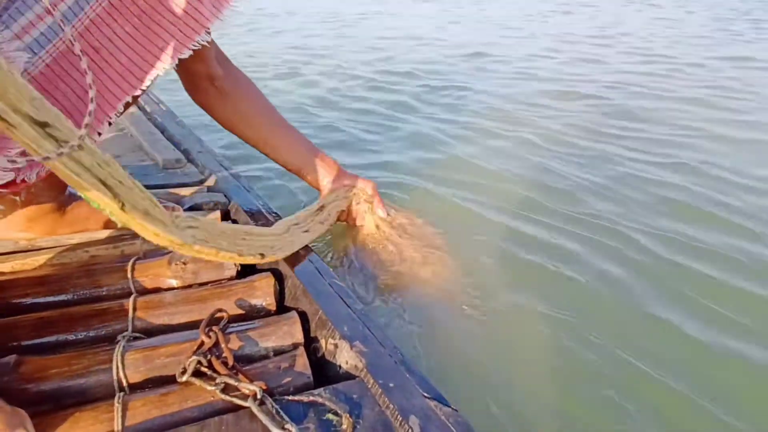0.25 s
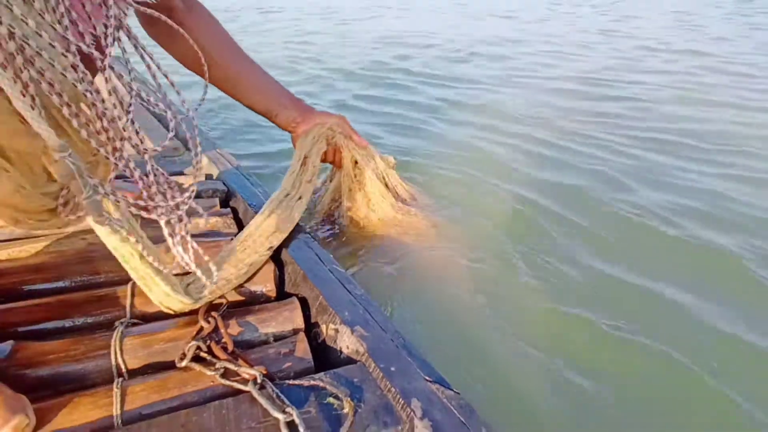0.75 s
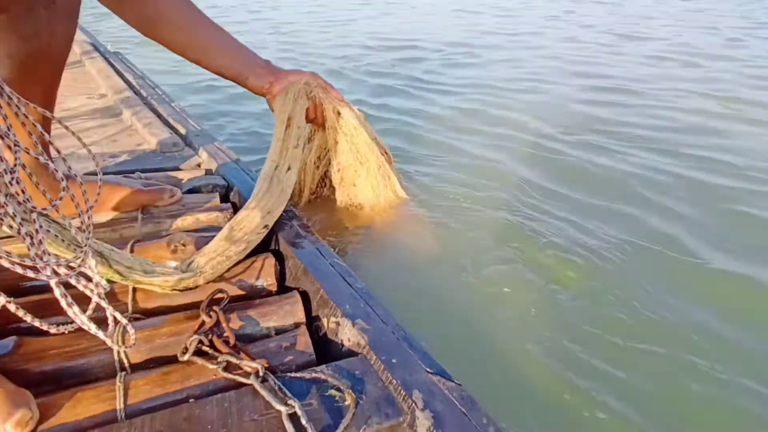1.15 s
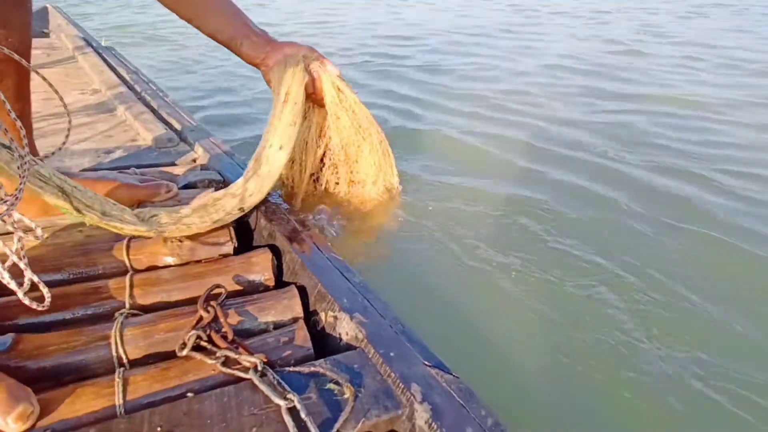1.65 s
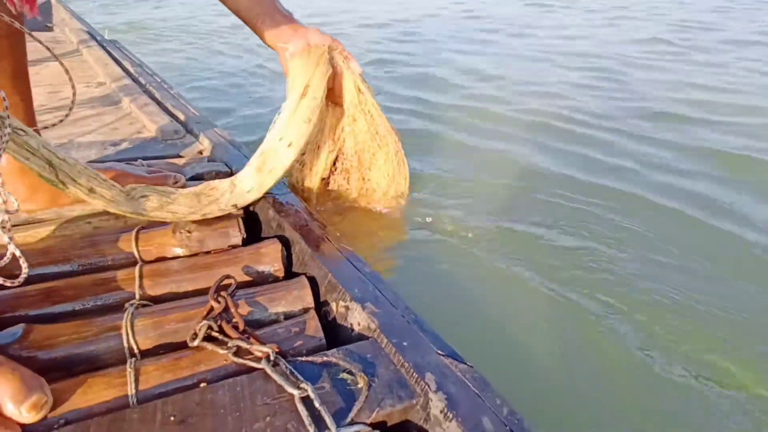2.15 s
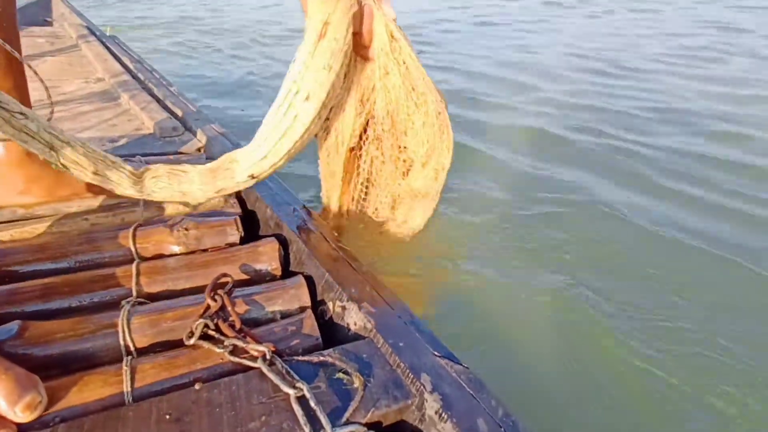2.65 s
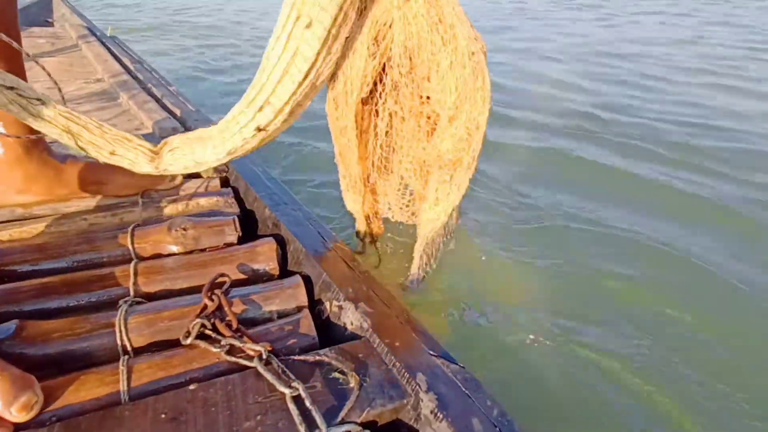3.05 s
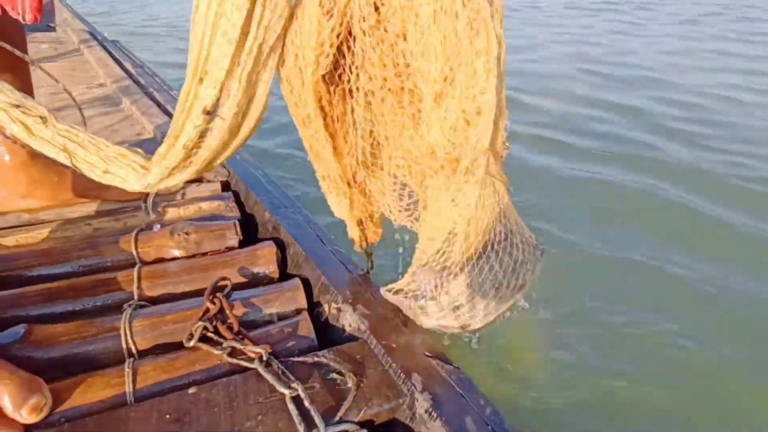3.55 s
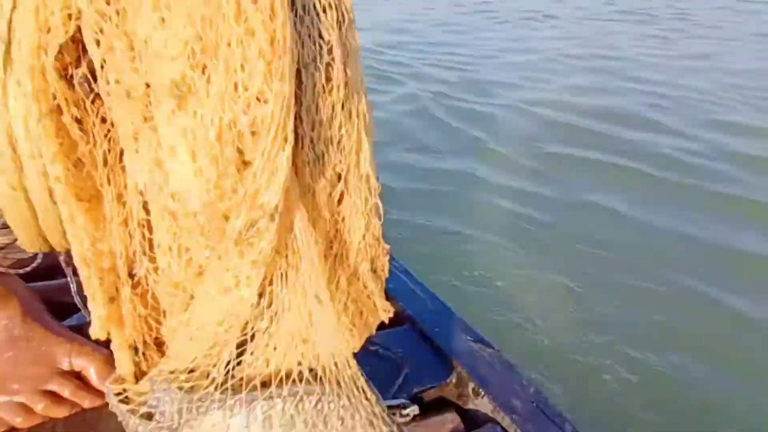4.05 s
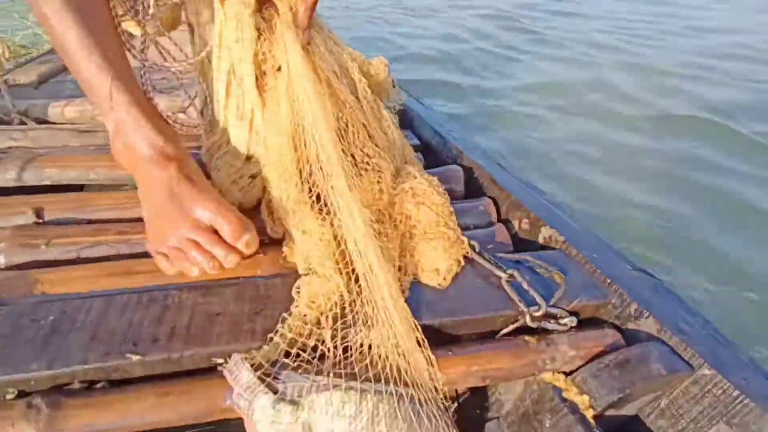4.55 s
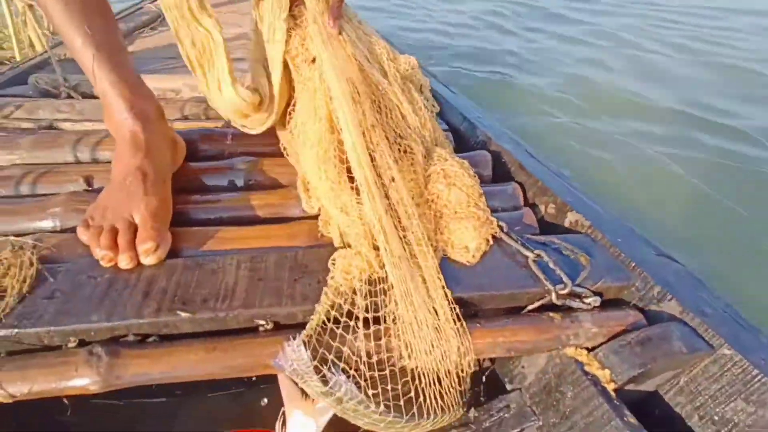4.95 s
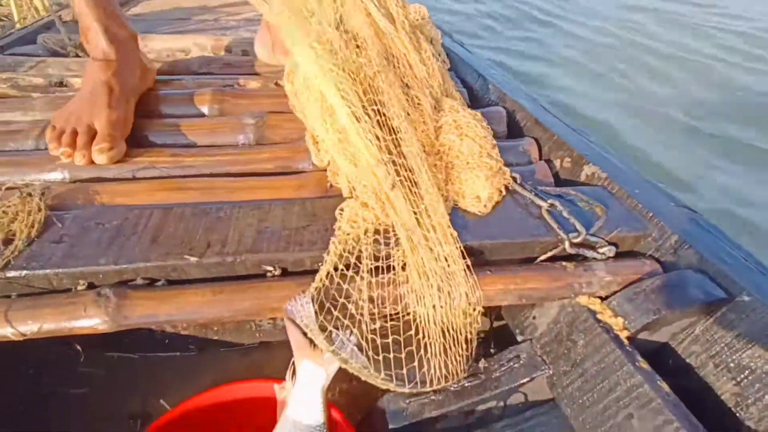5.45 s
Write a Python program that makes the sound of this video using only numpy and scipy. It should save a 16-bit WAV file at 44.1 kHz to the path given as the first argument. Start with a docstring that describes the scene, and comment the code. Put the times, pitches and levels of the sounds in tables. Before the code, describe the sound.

A breezy river heard close up from a wooden boat, in one channel. From the start, soft low wind rumbles and lumpy thumps buffet the microphone over a faint, smooth water hiss. A light wooden tick comes at 0.2 s, and drips and small bubble plinks gather around 0.8 to 1.8 s. It is then calmer until about 2.8 s, with thumps and barely audible thin bird whistles near 0.7, 2.1 and 2.4 s. From 2.9 to 4 s water runs off the lifted net in quick ticks, spits and upward-chirping bubbles, busiest around 3.5 s. Wet spatter leads into the loudest moment at about 4.25 s: a sharp, dry, woody smack with clustered knocks and a crackling burst of spray. Smaller knocks fade by 4.55 s. Crisp spatters follow at 4.65 to 4.8 s, then a faint tap at 5 s, a dull thump at 5.3 s, and light drips over a brighter hiss until 5.7 s.

```python
"""Hauling in a wet net

On a breezy day a wet net comes out of a river into a wooden boat. Its bundle slaps onto the planks:
crackling noise, a hail of drops, a sharp click, and knocks that ring the wood as fading sines.
Drops burst as puffs of noise and trap bubbles that ring, most rising in pitch. Behind them the river
hisses as shaped noise, wind rumbles and thumps on the microphone, and a far bird whistles arched sines."""
import sys
import numpy as np
from scipy import signal
from scipy.fft import rfft, irfft
from scipy.io import wavfile

SR = 44100
rng = np.random.default_rng(int(sys.argv[2]) if len(sys.argv) > 2 else 0)


def digitize_waveform(pressure):
    """Quantize a signal to 16-bit integers and store it at the path in sys.argv[1].

    Rows of a 2-D input are taken as channels; values are limited to [-1, 1].
    """
    field = np.atleast_2d(pressure).T
    bounded = np.clip(field, -1, 1)
    quanta = np.round(bounded * 32767).astype(np.int16)
    wavfile.write(sys.argv[1], SR, quanta)


N = 251811   # length in samples


def from_db(db):
    """Turns decibels into a plain gain."""
    return 10 ** (np.asarray(db) / 20)


def rms_one(x):
    """Scales a sound to an rms (average strength) of 1."""
    return x / np.sqrt(np.mean(x ** 2) + 1e-20)


def in_time(rows):
    """Joins the rows of a table with straight lines; one curve for each column after the time."""
    s, *columns = np.transpose(rows)
    return [np.interp(np.arange(N) / SR, s, c) for c in columns]


def band(x, low_hz, high_hz):
    """Keeps the sound between two pitches."""
    edges = [low_hz, min(high_hz, .45 * SR)]
    return signal.sosfilt(signal.butter(2, edges, "band", fs=SR, output="sos"), x)


def drift(rate_hz):
    """A random curve of rms 1 that wanders slowly or quickly; made at every 40th sample, then joined up."""
    r = np.exp(-80 * np.pi * rate_hz / SR)
    slow = signal.lfilter([1], [1, -2 * r, r * r], rng.standard_normal(N // 40 + 2002))[2000:]
    return np.interp(np.arange(N) / 40, np.arange(len(slow)), rms_one(slow))


def colour(x, spectrum):
    """Weights each pitch of x by the table, then scales to rms 1."""
    hz, db = np.transpose(spectrum)
    grid = np.maximum(np.arange(N // 2 + 1) * SR / N, 1)
    gain = from_db(np.interp(np.log(grid), np.log(hz), db))
    return rms_one(irfft(rfft(x) * gain, N))


def ring(clicks, hz, t60):
    """Each unit click starts a sine of height 1 that fades by 60 dB in t60 seconds."""
    r, w = from_db(-60 / (t60 * SR)), 2 * np.pi * hz / SR
    return signal.lfilter([0, np.sin(w)], [1, -2 * r * np.cos(w), r * r], clicks + 1e-18)


def add(out, s, x):
    """Mixes x into out, starting at s seconds."""
    i = round(s * SR)
    out[i:i + len(x)] += x[:N - i]


# weights and bundle hitting the planks: t/s, strength level/dB
BLOWS = [(0.226, -23), (0.505, -40), (0.848, -39.5), (2.298, -37), (2.427, -39.5), (3.807, -45),
         (4.227, -14.5), (4.265, -15), (4.278, -6), (4.376, -27), (4.409, -23), (4.452, -35),
         (4.489, -29.5), (4.538, -34.5), (5.006, -33.5)]
# ways the planks ring: f/Hz, relative level/dB, time to fade by 60 dB t/s
PLANK_MODES = [(386, 6, 0.0088), (522, 3.5, 0.045), (744, -0.5, 0.037), (920, 2, 0.023), (1284, 3.5, 0.034),
               (1600, 5.5, 0.021), (2083, -9, 0.04)]


def knocks():
    """A blow gives a short crack of noise and sets every plank mode ringing afresh."""
    crack_db, ring_db = -14.5, -15.5   # relative to the blow's strength
    out, t = np.zeros(N), np.arange(SR // 8) / SR
    chance_db = rng.normal(0, 2, (len(BLOWS), len(PLANK_MODES)))
    cracks = rng.standard_normal((len(BLOWS), len(t)))
    for (s, db), luck_db, crack in zip(BLOWS, chance_db, cracks):
        crack = crack + 14.3 * (t == 0)      # the first contact is the sharpest
        for low_hz, high_hz in [(620.0, 4600.0), (400.0, 4700.0), (300.0, 5100.0)]:
            crack = band(crack, low_hz, high_hz)
        add(out, s, from_db(db + crack_db - 60 * t / 0.0078) * rms_one(crack))
        for k, (hz, level_db, t60) in enumerate(PLANK_MODES):
            gain = from_db(db + level_db + luck_db[k] + ring_db)
            fade = (-1) ** k * from_db(-60 * t / t60)   # every other mode is flipped
            add(out, s, gain * fade * np.sin(2 * np.pi * hz * t))
    return out


# water and wet mesh landing or dragging: t/s, length t/s, spray level/dB,
# crunch level/dB above the spray, drops level/dB above the spray
LANDINGS = [(1.546, 0.042, -59.5, 5, 6.5), (1.768, 0.075, -66, 0, 13), (4.089, 0.031, -43, -3.5, -2.5),
            (4.125, 0.086, -39.5, -24, -7), (4.214, 0.054, -38, -1, -8), (4.261, 0.036, -35.5, 6, -1),
            (4.274, 0.043, -27.5, -6.5, -5.5), (4.314, 0.045, -42.5, -18, -9),
            (4.719, 0.078, -50, -5.5, 0.5), (5.088, 0.081, -54, -26, -3), (5.207, 0.063, -50.5, 0, -2),
            (5.282, 0.057, -48, 2.5, -2.5)]
# tone of the spray, here and in the drops below: f/Hz, relative level/dB (per Hz)
SPRAY_TONE = [(1180, -53), (2000, -16), (2810, -6), (3090, -6), (6700, -1), (10600, -9.5), (14400, -23),
              (16000, -27)]


def slap():
    """Many wet strands land within moments: crackling spray, a hail of drops, and crunching planks."""
    sag_db_per_s = 44   # a slap weakens while it lasts
    crackle = from_db(3.5 * drift(100))
    spray = colour(rng.standard_normal(N) * crackle, SPRAY_TONE)
    hail = droplets(per_s=300.0, cycles=39.0)
    landing = rng.random(N) < 900.0 / SR     # about 900 small blows a second
    crunch = 0
    for hz, db, t60 in PLANK_MODES:
        crunch = crunch + from_db(db) * ring(landing * rng.standard_normal(N) * crackle, hz, t60)
    rustle = rms_one(band(rng.standard_normal(N) * crackle, 400.0, 3600.0))
    body = rms_one(crunch) + 0.74 * rustle
    out, t = np.zeros(N), np.arange(N) / SR
    for s, length, spray_db, body_db, hail_db in LANDINGS:
        rise = np.clip((t - s) / 0.013, 0, 1)
        fall = np.exp(-np.maximum(t - s - length, 0) / 0.004)
        level = from_db(spray_db - sag_db_per_s * np.maximum(t - s, 0))
        out += rise * fall * level * (spray + from_db(body_db) * body + from_db(hail_db) * hail)
    return out


# puffs of noise: drops bursting, and the sharp click of the main hit:
# t/s, level/dB, centre f/Hz, mist level/dB above the puff
PUFFS = [(0.168, -44.5, 9980, -11), (0.847, -42, 2310, -25), (0.858, -45.5, 6850, -20),
         (0.905, -47, 3500, -20), (1.004, -46, 7750, -18), (1.035, -45, 7040, -28),
         (1.054, -38.5, 7240, -27), (1.132, -45, 2720, -2), (1.1827, -39, 7000, 1),
         (1.4581, -46, 6800, -19), (1.5565, -43, 2680, -25), (1.5718, -34, 7320, -20),
         (1.6585, -41.5, 7500, -18), (1.6807, -47, 2640, 2), (1.769, -46.5, 4440, -13),
         (1.807, -40.5, 3430, -15), (2.4257, -45.5, 4540, -7), (2.7425, -48, 7960, -15),
         (2.805, -42, 4700, -24), (2.8705, -35.5, 7050, -4), (2.91, -49.5, 4500, -1),
         (2.951, -40, 7600, -10.5), (3.008, -38, 3450, -8), (3.1232, -33, 3600, -27),
         (3.1951, -42.5, 4830, -1), (3.2245, -44, 9100, -16), (3.2913, -40.5, 5130, -15),
         (3.3266, -34.5, 7040, -7), (3.3952, -53, 2920, -16), (3.428, -42.5, 8800, -14),
         (3.46, -36, 3730, -8), (3.491, -27.5, 7800, -5), (3.5315, -37, 4960, -8),
         (3.5472, -36.5, 2610, -19), (3.587, -37.5, 8060, -22), (3.621, -45, 4340, -23),
         (3.6466, -39, 6160, -9), (3.67, -46, 4000, 5), (3.719, -29, 3070, -15), (3.7367, -31.5, 6700, -6),
         (3.822, -43, 2600, -3), (3.9245, -39.5, 7700, -6), (3.946, -38, 7040, -7),
         (3.9885, -36.5, 7900, 0), (4.0277, -31.5, 7600, -19), (4.1002, -29.5, 6700, -4),
         (4.157, -22, 6250, -6), (4.1722, -19, 7900, -24), (4.213, -29, 6800, 1), (4.2277, -25.5, 8400, 3),
         (4.2793, -11, 2710, -35), (4.315, -30, 6000, 3), (4.374, -34.5, 6860, -22),
         (4.4067, -38.5, 5060, -22), (4.4135, -38, 7600, -10), (4.4315, -37.5, 7950, -19),
         (4.4556, -34, 6060, -13), (4.6523, -31.5, 8400, -7), (4.6714, -26.5, 4700, 1.5),
         (4.7128, -34, 5200, 1), (4.744, -30, 7800, -13), (4.776, -27.5, 5600, -10), (4.992, -44, 5230, 7),
         (5.039, -46, 3540, 5), (5.072, -45, 6000, 2), (5.107, -38.5, 7400, -17), (5.2895, -41, 7740, -2),
         (5.4103, -37, 3500, -24), (5.4735, -34, 4000, -11), (5.5413, -51, 4500, -2), (5.583, -45, 3580, 6),
         (5.6185, -38, 3800, -0.5), (5.647, -48, 3500, -8), (5.686, -42.5, 7500, -11)]


def splats():
    """A burst drop, or the main hit's click, is a short puff of noise around its own pitch, with fine mist."""
    out, t = np.zeros(N), np.arange(SR // 8) / SR
    noise = rng.standard_normal((len(PUFFS), 2, len(t)))
    sprays = colour(rng.standard_normal(N), SPRAY_TONE)
    life = from_db(-60 * t / 0.023) * (1 - np.exp(-t / 0.00081))
    widths = rng.uniform(0.083, 0.88, len(PUFFS))   # octaves; the narrowest are widened to 0.1 below
    for (s, db, hz, mist_db), (white, fine), octaves in zip(PUFFS, noise, widths):
        half = 2 ** (np.clip(octaves, .1, 4) / 2)
        puff = rms_one(band(white, hz / half, hz * half))
        spray = from_db(-11.5) * np.roll(sprays, -round(s * SR))[:len(t)]
        mist = from_db(mist_db) * rms_one(band(fine, 12500.0, 15600.0)) * from_db(-60 * t / 0.084)
        add(out, s, from_db(db) * life * (puff + spray + mist))
    return out


# trapped bubbles: t/s, level/dB, starting f/Hz, rise in octaves per s (negative falls)
TRAPPED_AIR = [(.508, -42, 800, -7), (0.782, -46.5, 1104, 1), (.815, -48, 2270, 13), (1.036, -33, 1198, -1),
               (1.074, -46.5, 1120, 6.5), (1.133, -58, 1390, 11), (1.222, -53, 1570, 8),
               (1.54, -35, 1880, 4), (1.556, -40, 2160, 6.5), (1.573, -44.5, 1156, 4), (1.611, -47, 810, 8),
               (1.696, -51, 1770, -1), (1.769, -43, 1130, -6), (1.785, -44.5, 1240, 43),
               (1.847, -52, 1970, -11), (2.304, -51, 1370, 5), (2.549, -47, 1850, 3),
               (2.872, -49.5, 1350, 3), (2.901, -43, 1600, 9), (3.005, -47.5, 1173, -16),
               (3.187, -45, 850, -1), (3.224, -33.5, 1106, 32), (3.239, -45, 880, 5),
               (3.261, -47, 1480, -11), (3.292, -44.5, 1060, 56), (3.349, -43, 870, 6),
               (3.39, -56, 920, 34), (3.396, -41, 2850, 6), (3.442, -49, 1030, 45),
               (3.501, -39.5, 1450, 40), (3.508, -38, 3150, 14), (3.552, -42.5, 1093, 2),
               (3.6, -58, 1110, 25), (3.62, -30.5, 4150, 2), (3.634, -45, 1790, 63),
               (3.668, -43.5, 1550, 1), (3.823, -44.5, 1930, -4), (4.199, -46, 1330, 13),
               (4.357, -42, 1050, -7), (4.425, -41.5, 606, 11), (4.453, -46, 850, 27),
               (4.5, -35, 568, 11.5)]


def bubbles():
    """A bubble rings as a dying, wavering sine; near the surface its pitch climbs and it is damped less."""
    ring_cycles, longer_per_rise = 75.0, 0.014   # cycles to fade by 60 dB; extra share per octave/s
    out, t = np.zeros(N), np.arange(SR // 5) / SR
    for s, db, hz, rise in TRAPPED_AIR:
        t60 = ring_cycles / hz * (1 + longer_per_rise * max(rise, 0))
        climb = np.clip(rise * t, -1, 2)     # octaves from the starting pitch
        phase = 2 * np.pi * np.cumsum(hz * 2 ** climb) / SR
        fade = from_db(-60 * t / t60 - 13.0 * climb ** 4)   # a large change of pitch ends it sooner
        attack = 1 - np.exp(-t / 0.000093)
        add(out, s, from_db(db) * fade * attack * np.sin(phase))
    return out * from_db(4.5 * drift(90))


def droplets(per_s, cycles):
    """Fine drops at random, each ringing and fading over a number of cycles; high ones are louder."""
    dip_hz, dip_octaves, dip_db = 10800, 0.14, -18.5   # the microphone picks up less near this pitch
    sizes = from_db(3.2 * np.minimum(rng.exponential(1, N), 3)) * rng.choice([-1, 1], N)
    born = rng.random(N) < per_s * from_db(5.0 * drift(20.0)) / SR
    pitches, dealt = np.geomspace(1800.0, 15000.0, 20), rng.integers(0, 20, N)
    rings = 0
    for k, hz in enumerate(pitches):
        dip = from_db(dip_db * np.exp(-(np.log2(hz / dip_hz) / dip_octaves) ** 2))
        rings = rings + hz ** 0.84 * dip * ring(sizes * born * (dealt == k), hz, cycles / hz)
    return rms_one(band(rings, 1000.0, 24000))


def sputter(per_s, t60):
    """Tiny bursts of spray at random, each a dying puff of noise."""
    born = rng.random(N) < per_s / SR
    sizes = from_db(4.0 * np.minimum(rng.exponential(1, N), 3))
    life = signal.lfilter([1], [1, -from_db(-60 / (t60 * SR))], born * sizes + 1e-18)
    return colour(life * rng.standard_normal(N), SPRAY_TONE)


# river and water running off the mesh: t/s, hiss level/dB, droplets level/dB
WATER = [(0.0, -58, -71), (0.48, -54, -67), (0.84, -57.5, -71.5), (1.11, -55.5, -62), (1.38, -55.5, -71.5),
         (1.7, -57, -63), (1.84, -56, -70), (2.89, -56.5, -66), (3.62, -56, -51), (3.78, -56, -55),
         (4.04, -51.5, -63.5), (4.25, -42, -59), (4.44, -50, -61), (4.99, -51.5, -60.5), (5.17, -52.5, -61),
         (5.71, -52, -58.5)]
# tone of the hiss: f/Hz, relative level/dB (per Hz)
HISS_TONE = [(350, 8), (600, 6.5), (1260, -2), (2250, -8.5), (3000, -10), (4800, -6.5), (6200, -15.5),
             (7500, -1.5), (10600, -12.5), (14500, -0.5), (16000, -2.5)]
# treble of the hiss: t/s, level/dB
HISS_TREBLE = [(0.0, -64.5), (1.18, -65), (1.94, -72), (2.96, -68), (3.44, -67), (4.26, -52), (4.39, -59.5),
               (5.71, -56)]


def river():
    """A smooth noise hiss, its treble following a level of its own, with fine drops on top."""
    hiss_db, drops_db = in_time(WATER)
    treble_db, = in_time(HISS_TREBLE)
    hiss = colour(rng.standard_normal(N), HISS_TONE) * from_db(1.3 * drift(20))
    split_hz = 8800   # the treble starts here
    low = signal.sosfiltfilt(signal.butter(3, split_hz, "low", fs=SR, output="sos"), hiss)
    top = signal.sosfiltfilt(signal.butter(3, split_hz, "high", fs=SR, output="sos"), hiss)
    drops = droplets(per_s=200.0, cycles=51.0) + 0.66 * sputter(per_s=70.0, t60=0.016)
    return from_db(hiss_db) * low + from_db(treble_db) * rms_one(top) + from_db(drops_db) * drops


# wind on the microphone: t/s, rumble level/dB, upper rumble level/dB above it
GUSTS = [(0, -34.5, -3), (0.16, -32.5, -8), (0.26, -42.5, 0), (0.36, -27, -23), (0.65, -33, -7),
         (0.8, -23, -5.5), (1.3, -29, -11.5), (1.73, -32, -6), (2.22, -30, -13), (2.4, -42, -3),
         (2.58, -34.5, -9.5), (2.69, -26.5, -7), (2.9, -34, -7.5), (3.13, -26, -7), (3.3, -31, -6.5),
         (3.8, -32.5, -6), (3.92, -23, -9), (4.17, -25.5, -8.5), (4.3, -34, 1), (4.55, -30, -7),
         (4.9, -35, -10), (5.22, -29, -12.5), (5.3, -34, -3), (5.4, -35.5, -5), (5.71, -37, -9)]
# tone of the wind: f/Hz, relative level/dB (per Hz)
WIND_TONE = [(15, -48), (25, -51), (57, -7), (113, -1), (202, -6), (350, -15), (659, -36), (972, -56),
             (1200, -83), (1560, -72), (2640, -120)]
# low thumps: wind buffets, and near the end probably a knock or footstep:
# start t/s, peak level/dB, f/Hz, rasp level/dB above the peak
LOW_THUMPS = [(0.321, -21.5, 105, -38), (0.53, -19, 111, -24), (0.693, -15.5, 170, -34),
              (0.877, -32.5, 128, 2.5), (1.305, -22.5, 130, -16), (1.4, -25.5, 187, -17),
              (2.073, -16.5, 133, -39), (2.21, -15.5, 136, -28), (2.651, -16, 92, -37),
              (2.928, -15.5, 123, -29), (3.104, -13.5, 110, -27), (3.262, -15.5, 196, -10),
              (3.283, -19, 212, -19), (3.41, -18, 154, -39), (3.603, -15, 153, -32), (3.746, -23, 135, -34),
              (3.882, -17.5, 121, -18), (4.239, -23, 121, -9), (4.35, -15, 143, -12),
              (5.032, -20.5, 147, -21), (5.309, -16, 99.5, -7.5)]


def wind():
    """Lumpy turbulence as low noise; eddies and other thumps swell as low sines, each with its own rasp."""
    rumble_db, upper_db = in_time(GUSTS)
    lumps = drift(18.6)
    air = colour(rng.standard_normal(N), WIND_TONE)
    deep = signal.sosfilt(signal.butter(2, 200.0, fs=SR, output="sos"), air)
    low = rms_one(deep) * from_db(2.58 * lumps)
    upper = rms_one(air - deep) * from_db(upper_db + 4.4 * lumps + 2 * drift(19.0))
    out = from_db(rumble_db) * (low + upper)
    t = np.arange(SR // 10) / SR
    rasp = rms_one(band(band(rng.standard_normal(N), 105.0, 387.0), 186.0, 580.0))
    for s, db, hz, rasp_db in LOW_THUMPS:   # each is a swell of two or three cycles
        swell = np.exp(-((t - 1.62 / hz) * hz / 0.72) ** 2)
        rough = from_db(rasp_db) * np.roll(rasp, -round(s * SR))[:len(t)]
        add(out, s, from_db(db) * swell * (np.sin(2 * np.pi * hz * t) + rough))
    return out


# a far bird: t/s, length t/s, top f/Hz, level/dB
WHISTLES = [(.655, .05, 5560, -70), (2.126, 0.047, 5700, -66), (2.364, .06, 5730, -66.5)]


def bird():
    """Thin sine whistles whose pitch arches up and down."""
    out = np.zeros(N)
    for s, length, hz, db in WHISTLES:
        u = np.linspace(-1, 1, round(length * SR))   # -1 at the start, 0 in the middle, 1 at the end
        phase = 2 * np.pi * np.cumsum(hz * (1 - 0.041 * u ** 2)) / SR
        add(out, s, from_db(db) * (1 - u ** 4) * np.sin(phase))
    return out


def scene():
    """Adds all the layers together, in one channel."""
    return (knocks() + slap() + splats() + bubbles() + river() + wind() + bird())[None]


def record(dry):
    """Cuts the very top steeply, above 15500 Hz."""
    return signal.sosfilt(signal.ellip(12, .3, 75, 15500, fs=SR, output="sos"), dry)


dry = scene()
out = record(dry)
digitize_waveform(out)
```